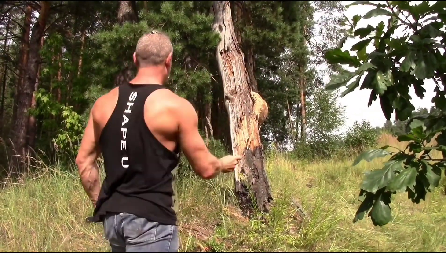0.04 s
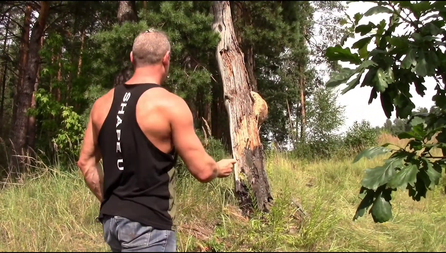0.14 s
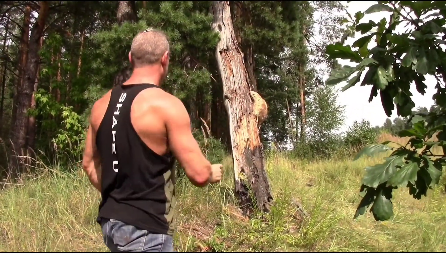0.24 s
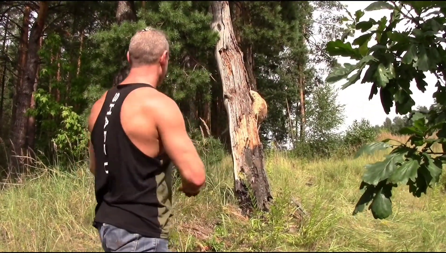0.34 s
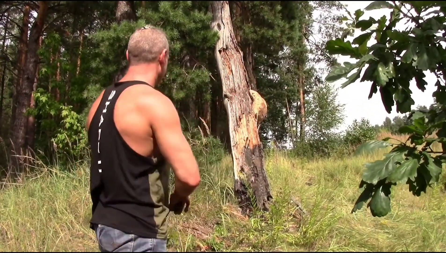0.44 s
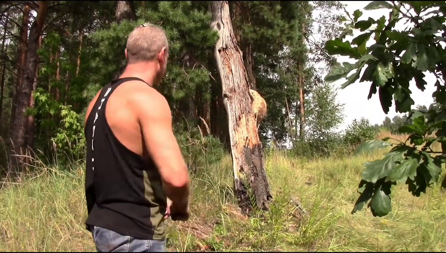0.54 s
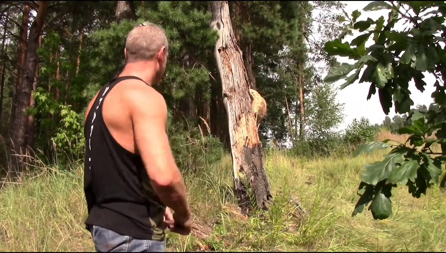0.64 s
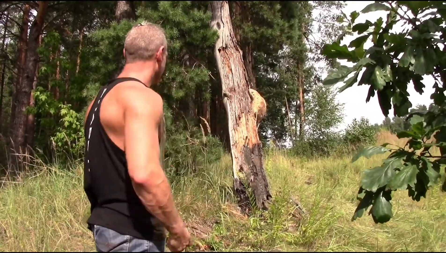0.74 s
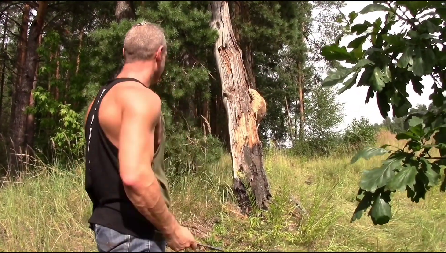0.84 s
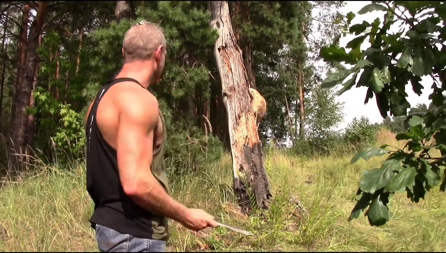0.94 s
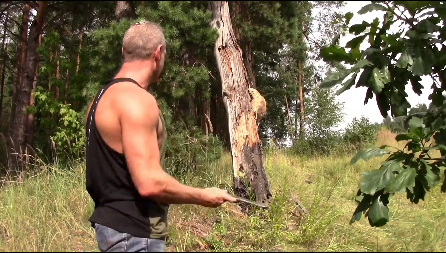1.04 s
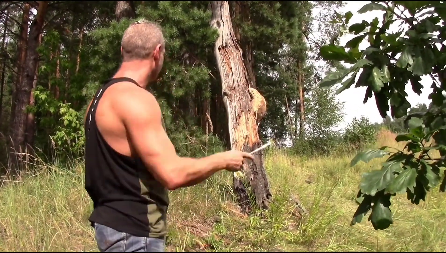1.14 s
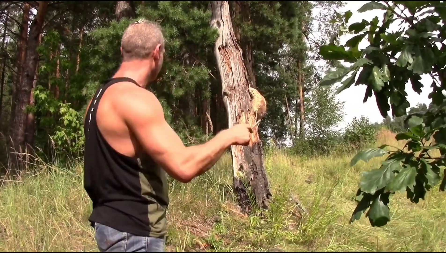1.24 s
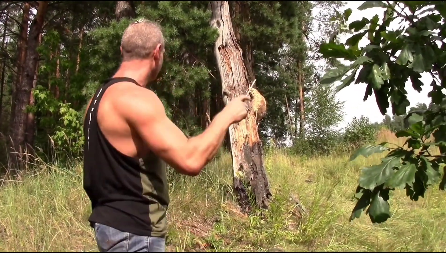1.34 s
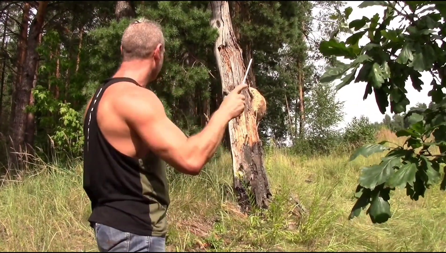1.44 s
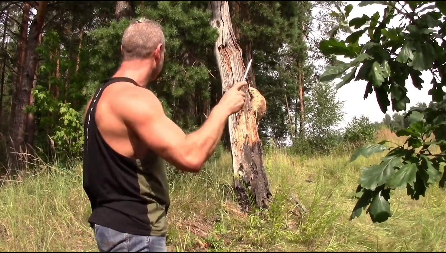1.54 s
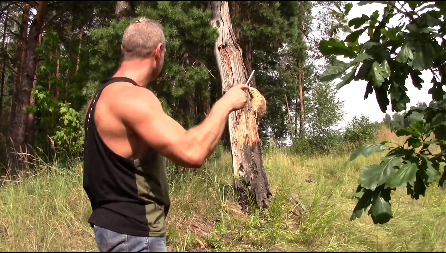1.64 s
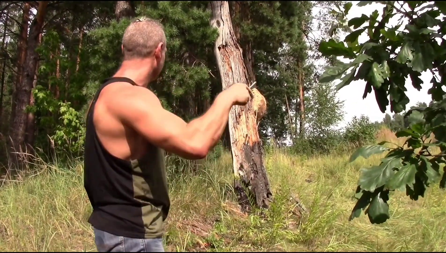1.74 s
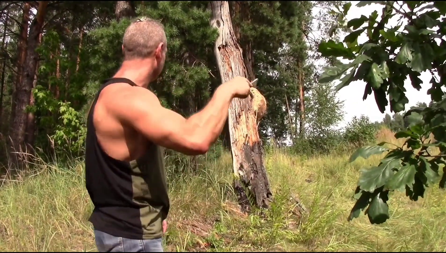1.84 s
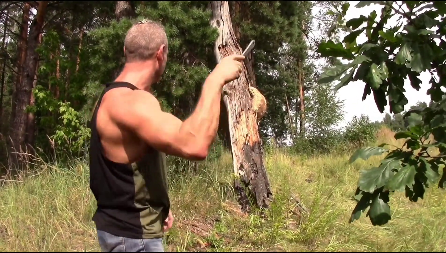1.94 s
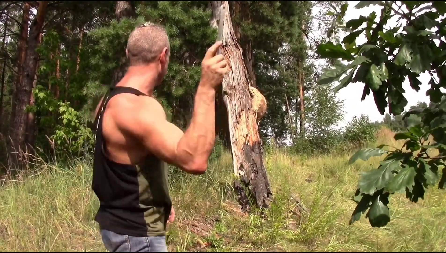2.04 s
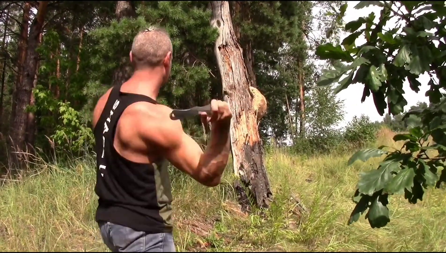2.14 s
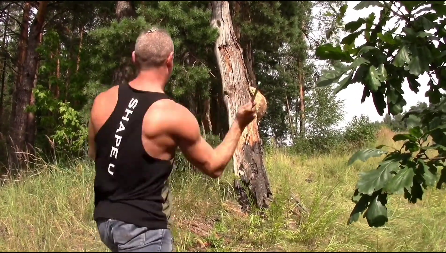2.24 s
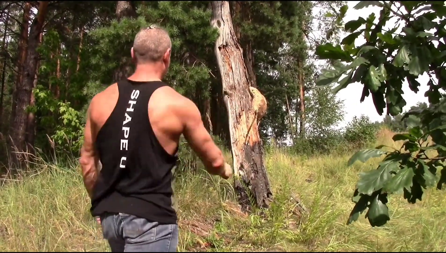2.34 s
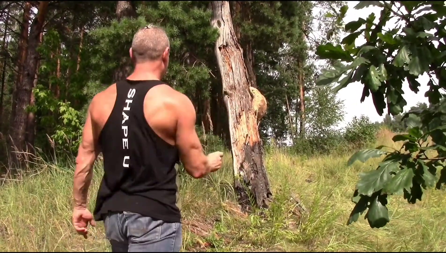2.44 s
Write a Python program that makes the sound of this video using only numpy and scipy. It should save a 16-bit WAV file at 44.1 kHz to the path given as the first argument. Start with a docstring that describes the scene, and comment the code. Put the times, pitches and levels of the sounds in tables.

```python
"""A forest, with a soft wash of air in the trees. A steel throwing knife whips past and thuds into a dead
trunk: its point splits the fibres with a crack, the wood rings briefly, and the ground and the trees
throw the blow back. The spare knives clink in the thrower's hand. As he winds up for the next throw,
his clothes and the dry grass rustle, twigs snap, and hand and foot make dull taps."""
import sys
import numpy as np
from scipy import signal
from scipy.fft import rfft, irfft
from scipy.io import wavfile
from scipy.ndimage import uniform_filter1d

SR = 44100
rng = np.random.default_rng(int(sys.argv[2]) if len(sys.argv) > 2 else 0)


def put_to_file(sound):
    """Save the sound as 16-bit audio at rate SR, in the file named by the first command-line argument."""
    columns = np.atleast_2d(sound).T  # one column per channel
    safe = np.clip(columns, -1, 1)
    whole_steps = np.round(safe * 32767)
    wavfile.write(sys.argv[1], SR, whole_steps.astype(np.int16))


N = 110250
T = np.arange(N) / SR
HIT_S = .1982

# Tone of the air bed. Each row: frequency in Hz, relative level in dB.
AIR_TONE = [(25, -48), (50, -11.5), (100, -10.5), (190, -5), (400, -1.5), (570, -4.5), (900, -8.5),
            (1250, -14), (1800, -19), (3500, -25.5), (5500, -28), (8000, -26.5), (10000, -32.5),
            (15500, -37)]
# Fader ride on the air bed. Each row: time in seconds, level in dB.
AIR_FADER = [(0, -50), (.45, -51.5), (.9, -53.5), (1.4, -54.5), (1.8, -56), (2.15, -56), (2.5, -57)]
# Stereo width of the air and of the near sounds. Each row: frequency in Hz, side against mid in dB.
AIR_WIDTH = [(25, 3), (70, -13.5), (200, -14.5), (1000, -13.5), (2500, -4), (6000, -9), (15000, -3)]
NEAR_WIDTH = [(100, -20.5), (1200, -28), (2500, -19), (6000, -19), (14000, -13.5)]
# Swishes of cloth and grass, scuffs of the body, whooshes of the throw.
# Each row: peak time in seconds, level in dB, rise and fall widths in seconds.
SWISH_MOVES = [(.005, -51.5, .02, 0.019), (.12, -58, 0.072, 0.055), (.425, -58.5, 0.053, .05),
               (.56, -61, 0.069, 0.24), (.785, -46, 0.058, 0.023), (.9, -63.5, 0.21, 0.42),
               (2.075, -60.5, 0.053, 0.027), (2.18, -61, 0.024, 0.033), (2.3, -64.5, 0.087, 0.089),
               (2.495, -57, 0.042, .03)]
SCUFF_MOVES = [(.61, -53, 0.039, 0.031), (.9, -60.5, 0.11, 0.1), (2.27, -49.5, .03, 0.068),
               (2.42, -54, 0.093, 0.21)]
WHOOSH_MOVES = [(.105, -44, 0.01, 0.0086), (.14, -56.5, .015, .015)]
# Tone of those three layers. Each row: frequency in Hz, relative level in dB.
SWISH_TONE = [(150, -26), (500, 6), (640, 6), (780, 15), (950, -6), (2000, 1.5), (3600, -7.5), (5300, 0),
              (8000, -3.5), (12000, -10), (15500, -16)]
SCUFF_TONE = [(60, -26.5), (170, -0.5), (380, 5.5), (600, -2), (1000, -13), (3000, -39.5), (10000, -55)]
WHOOSH_TONE = [(100, -32.5), (330, 3.5), (700, -1.5), (1200, 0), (2000, -7.5), (3500, -13), (6000, -25),
               (15000, -40)]
# Snapping twigs and stalks; taps of hand and foot.
# Each row: start in seconds, level in dB, centre in Hz, 60 dB decay time in seconds.
TWIG_SNAPS = [(.423, -49, 7000, .035), (.515, -52, 8450, 0.018), (.559, -54, 8000, 0.011),
              (.575, -57, 8200, 0.0092), (.6575, -43, 3800, 0.025), (.717, -46, 5070, 0.0097),
              (.7395, -43, 9000, 0.0074), (.7555, -37, 6460, 0.01), (.779, -42.5, 5940, 0.019),
              (.787, -42, 5200, 0.03), (.837, -50, 6450, 0.014), (1.927, -57, 6940, 0.017),
              (2.152, -48, 6130, 0.012), (2.319, -57, 9000, .01)]
DULL_TAPS = [(.717, -42, 850, 0.014), (.791, -41, 900, 0.032), (1.216, -50, 2135, 0.025),
             (2.152, -52.5, 1050, 0.015), (2.1868, -39, 1120, 0.011), (2.252, -53, 445, 0.053)]
# Partials of the spare blades. Each row: frequency in Hz, relative level in dB, decay time in seconds.
STEEL_MODES = [(2940, -14.5, 0.057), (4290, -18, .06), (6220, 1.5, 0.066), (8500, -3, .05),
               (10950, -16, 0.045), (13800, -29, .03)]
# Blades touching, and a faint echo of the first touch at 0.055 s. Each row: start in seconds, level in dB,
# attack in seconds, pitch ratio, dB lost per octave away from the main partial.
BLADE_TOUCHES = [(0.0, -39.5, 0.0073, 1, 4), (.055, -54.5, 0.0068, 0.97, -2),
                 (.658, -50.5, .005, 1.052, 20), (2.484, -58, .012, 1.3, 0)]
# Faint lone ring of steel. Each row: start in seconds, pitch in Hz, level in dB, attack, decay in seconds.
LONE_RINGS = [(0.97, 2820, -59.5, 0.016, 0.15)]
# Tone of the scatter from the trees. Each row: frequency in Hz, gain in dB.
SCATTER_TONE = [(80, -34), (180, -22.5), (260, -20), (370, -15), (520, -13.5), (750, -18.5), (1200, -21),
                (1800, -22.5), (2500, -21), (5000, -13.5), (9000, -10), (15000, -4)]
# Length of that scatter. Each row: frequency in Hz, 60 dB decay time in seconds.
SCATTER_DECAY = [(100, 0.16), (350, 0.31), (1200, 0.24), (2500, 0.16), (6000, .16), (15000, 0.095)]
# Slapback from single trunks. Each row: delay in seconds, gain in dB, low and high edges in Hz.
TRUNK_SLAPS = [(0.03, -31, 254, 2600), (0.059, -23.5, 300, 513), (.08, -35, 450, 2240)]
# Tone of the splitting fibres. Each row: frequency in Hz, relative level in dB.
CRACK_TONE = [(40, -23.5), (120, -8), (400, 8.5), (1200, -1), (3000, -4), (3600, -5), (4000, -15),
              (4700, -9), (7000, -11.5), (10000, -23), (12000, -21.5), (16000, -38)]
# The trunk with the blade in it. Each row: frequency in Hz, level in dB, attack and decay in seconds.
TRUNK_MODES = [(184.5, -11.5, 0.0062, 0.025), (249, -20, 0.00553, 0.026), (363.3, -18.5, 0.01, 0.077),
               (443, -19.5, 0.0061, 0.056), (506.5, -25, 0.00424, .05), (635, -26, 0.0081, 0.031),
               (754, -14, .0035, 0.034), (798, -18, 0.0027, 0.02), (966, -23, 0.0037, .025),
               (1152, -10.8, .0062, .038), (1484, -18.5, 0.0053, .03), (1690, -32, 0.0063, 0.022),
               (1826, -25, 0.0051, 0.028), (2281, -21, 0.0029, 0.03), (2463, -16.5, 0.0036, 0.018),
               (2700, -32, 0.0053, .02), (2967, -20, 0.0054, 0.0078), (3126, -25, .005, 0.014),
               (3440, -27.5, 0.0032, .022), (3615, -26, 0.0024, .026)]


def amp(db):
    """Decibels to gain."""
    return 10 ** (np.asarray(db) / 20)


def unit(x):
    """Scales to rms 1."""
    return x / np.sqrt(np.mean(x ** 2) + 1e-20)


def noise():
    """White noise."""
    return rng.standard_normal(N)


def curve_at(points, hz):
    """Reads a curve on a log-frequency axis."""
    f, value = np.transpose(points)
    return np.interp(np.log(hz + 1), np.log(f + 1), value)


def eq(x, points):
    """Minimum-phase equaliser following a dB curve."""
    log_gain = np.log(amp(curve_at(points, abs(np.fft.fftfreq(4096, 1 / SR)))))
    response = np.exp(np.conj(signal.hilbert(log_gain)))
    return signal.fftconvolve(x, np.fft.ifft(response).real[:2048])[:N]


def lowpass(x, hz, order=2):
    """Butterworth low-pass."""
    return signal.lfilter(*signal.butter(order, hz, fs=SR), x)


def highpass(x, hz, order=2):
    """Butterworth high-pass."""
    return signal.lfilter(*signal.butter(order, hz, "high", fs=SR), x)


def delay(x, s):
    """The same sound, s seconds later."""
    return np.interp(T - s, T, x, left=0)


def envelope(start, rise, t60, hold=0):
    """Smooth attack, hold, then 60 dB of decay every t60 seconds."""
    t = T - start
    attack = np.sin(np.pi / 2 * np.clip(t / rise, 0, 1)) ** 2
    return attack * np.exp(-np.log(1000) * np.maximum(t - rise - hold, 0) / t60)


def ring(start, hz, db, rise, t60):
    """One partial swelling and dying."""
    return amp(db) * envelope(start, rise, t60) * np.sin(2 * np.pi * hz * (T - start))


def swells(rows):
    """Bell-shaped fades, summed in power."""
    bells = (amp(db) * np.exp(-.5 * ((T - s) / np.where(T < s, rise, fall)) ** 2)
             for s, db, rise, fall in rows)
    return np.sqrt(sum(bell ** 2 for bell in bells))


def stereo(mid, side):
    """Left and right from mid and side."""
    return np.array([mid + side, mid - side])


def air(patch_db=1.5):
    """The bed: a soft wash of air in the trees, in drifting patches."""
    spectrum = signal.stft(noise(), SR, nperseg=1024)[2]
    patches = uniform_filter1d(rng.standard_normal(spectrum.shape), size=14, axis=0)  # across frequency
    patches = unit(uniform_filter1d(patches, size=12, axis=1))  # across time
    wash = signal.istft(spectrum * amp(patch_db * patches), SR, nperseg=1024)[1][:N]
    return unit(eq(wash, AIR_TONE)) * amp(np.interp(T, *np.transpose(AIR_FADER)))


def forest(blow):
    """The trees throw the blow back: close scatter, a faint dark tail and a few distinct slaps."""
    hz, t, spectrum = signal.stft(noise(), SR, nperseg=256)
    decay = np.exp(-np.log(1000) * t / curve_at(SCATTER_DECAY, hz)[:, None])
    scatter = signal.istft(spectrum * decay, SR, nperseg=256)[1][:N] * np.clip(T / .0073, 0, 1)
    scatter = eq(scatter / np.linalg.norm(scatter), SCATTER_TONE)
    far = noise() * envelope(0, rise=.034, t60=.74)
    far = amp(-26) * lowpass(far / np.linalg.norm(far), hz=2004)
    slaps = sum(amp(db) * delay(highpass(lowpass(blow, high), low, order=4), s)
                for s, db, low, high in TRUNK_SLAPS)
    return signal.fftconvolve(blow, scatter + far)[:N] + slaps


def rustle(grains_per_s=2500, spread_db=3.5):
    """Tiny slips of cloth and grass under each movement, and the muffled scuff of the body."""
    grains = noise() * (rng.random(N) < grains_per_s / SR)
    grains *= amp(spread_db * np.minimum(rng.exponential(1, N), 4))
    texture = unit(grains) + .93 * noise()  # hiss softens the grain
    swish = unit(eq(texture, SWISH_TONE)) * swells(SWISH_MOVES)
    scuff = unit(eq(noise(), SCUFF_TONE)) * swells(SCUFF_MOVES)
    return swish + scuff


def ticks(rows, width_oct):
    """Snaps or taps: short toneless bursts, each round its own centre frequency."""
    f, bursts = np.fft.rfftfreq(N, 1 / SR) + 1, np.zeros(N)
    for s, db, hz, t60 in rows:
        band = 1 / (1 + (np.log2(f / hz) / width_oct) ** 2) ** 2
        bursts += amp(db) * envelope(s, .00017, t60) * unit(irfft(rfft(noise()) * band, N))
    return bursts


def clinks(main_hz=6191):
    """Spare blades in the hand touch and ring briefly."""
    touches = sum(ring(s, hz * pitch, db + mode_db - loss_db * abs(np.log2(hz / main_hz)), rise, t60)
                  for s, db, rise, pitch, loss_db in BLADE_TOUCHES for hz, mode_db, t60 in STEEL_MODES)
    return touches + sum(ring(*row) for row in LONE_RINGS)


def whoosh():
    """Arm and knife whip through the air just before the hit."""
    return unit(eq(noise(), WHOOSH_TONE)) * swells(WHOOSH_MOVES)


def thud(flutter_depth=.14, flutter_hz=400):
    """The main hit: the point splits fibres, the trunk rings and the grassy ground returns the bass."""
    body = np.zeros(N)
    for k, mode in enumerate(TRUNK_MODES):
        flutter = 1 + flutter_depth * unit(lowpass(noise(), flutter_hz))  # the blade grinds in
        body += (-1) ** k * ring(HIT_S, *mode) * flutter  # neighbours in opposite polarity
    # The splitting starts just before the trunk rings and lasts while the blade drives in.
    splitting = envelope(HIT_S - .0028, rise=.0042, t60=.029, hold=.0011)
    crack = amp(-18.5) * unit(eq(noise(), CRACK_TONE)) * splitting
    blow = highpass(body + crack, hz=137)  # a low cut keeps deep bass out of the thud
    bounce = amp(-10.5) * delay(lowpass(blow, hz=678, order=4), s=.01113)
    return blow + bounce


def scene(smear_t60_s=.0027):
    """The mix sits nearly dead centre; a short smear in the side channel opens up the treble."""
    blow = thud()
    near = whoosh() + blow + forest(blow) + clinks()
    near += ticks(TWIG_SNAPS, width_oct=1.1) + ticks(DULL_TAPS, width_oct=.65) + rustle()
    smear = noise() * np.exp(-np.log(1000) * T / smear_t60_s)
    side = eq(signal.fftconvolve(near, smear / np.linalg.norm(smear))[:N], NEAR_WIDTH)
    return stereo(near, side) + stereo(air(), eq(air(), AIR_WIDTH))


def record(dry, top_hz=15700):
    """A steep high cut on the whole mix."""
    high_cut = signal.firwin(511, top_hz, window=("kaiser", 9), fs=SR)
    return signal.oaconvolve(dry, high_cut[None], "same")


dry = scene()
out = record(dry)
put_to_file(out)
```